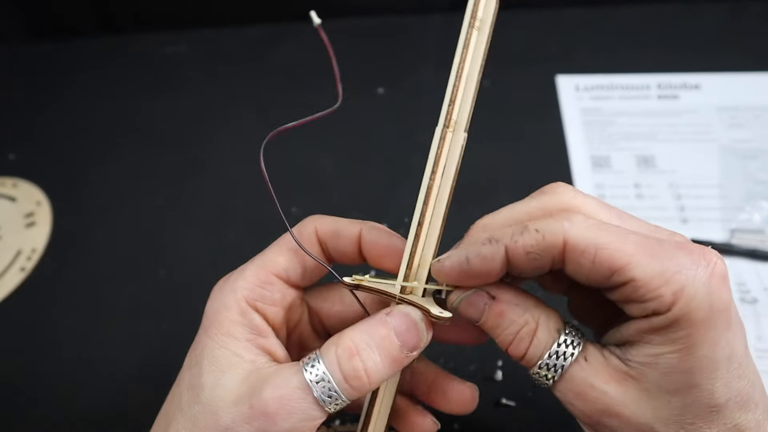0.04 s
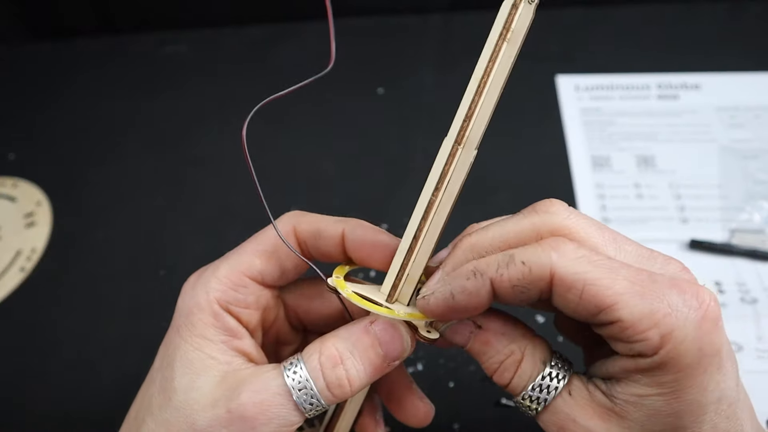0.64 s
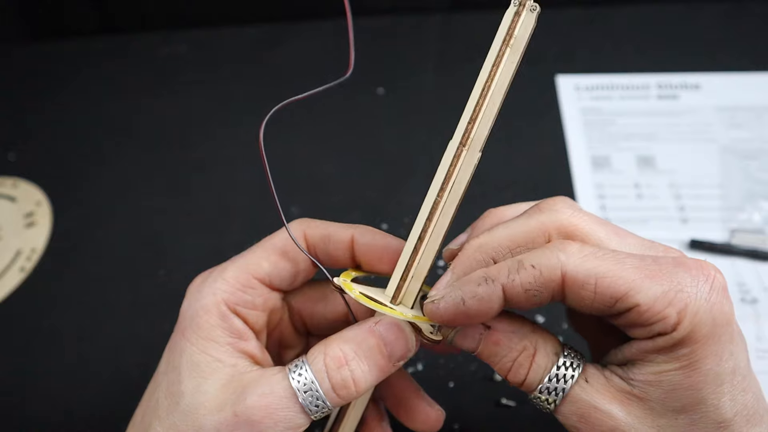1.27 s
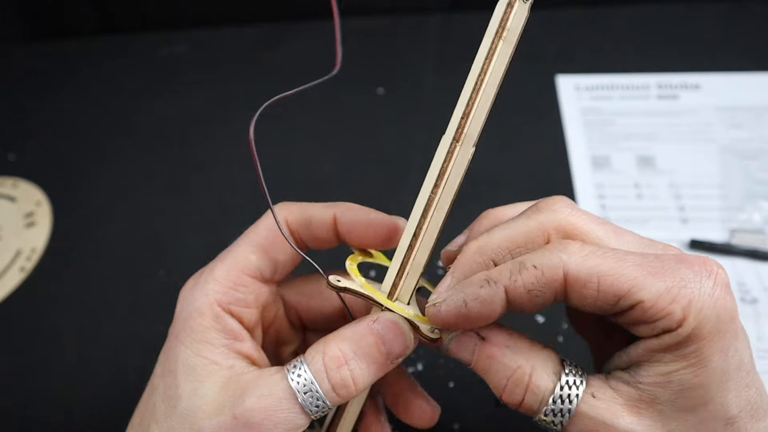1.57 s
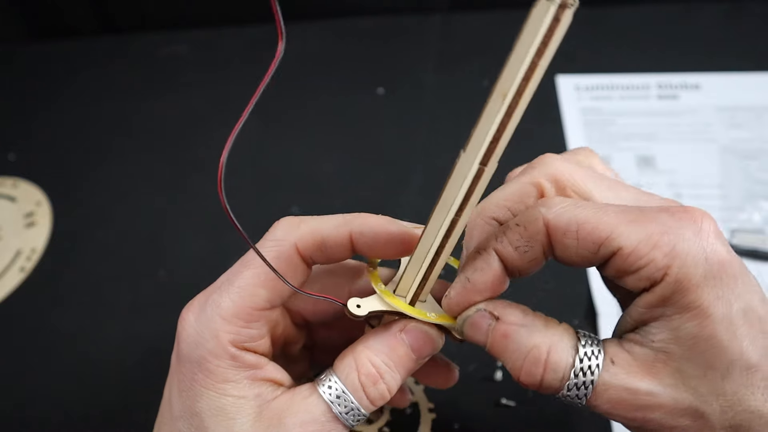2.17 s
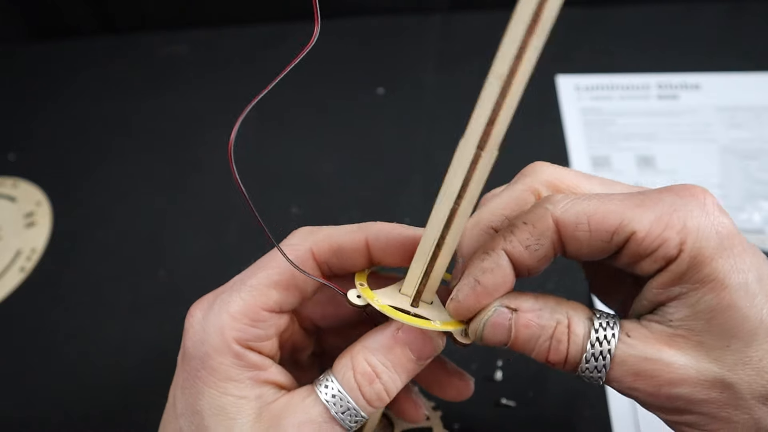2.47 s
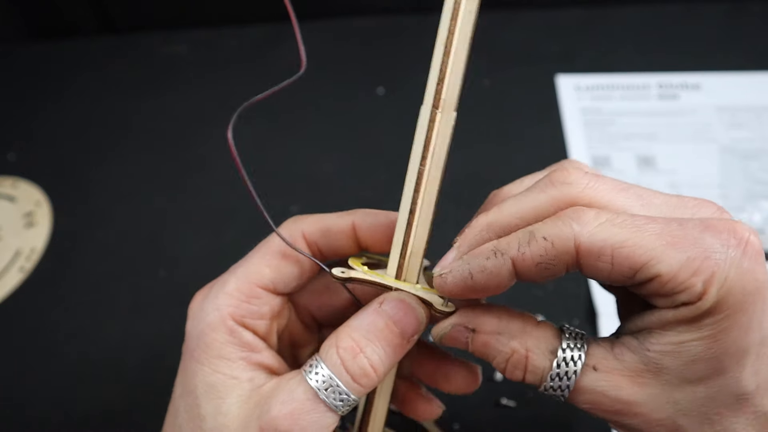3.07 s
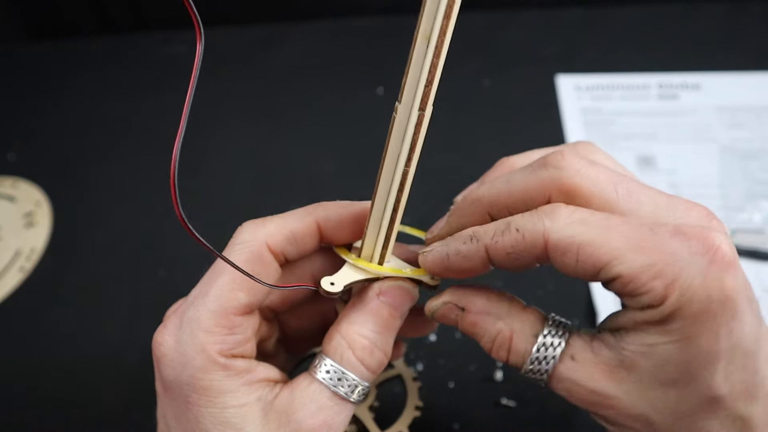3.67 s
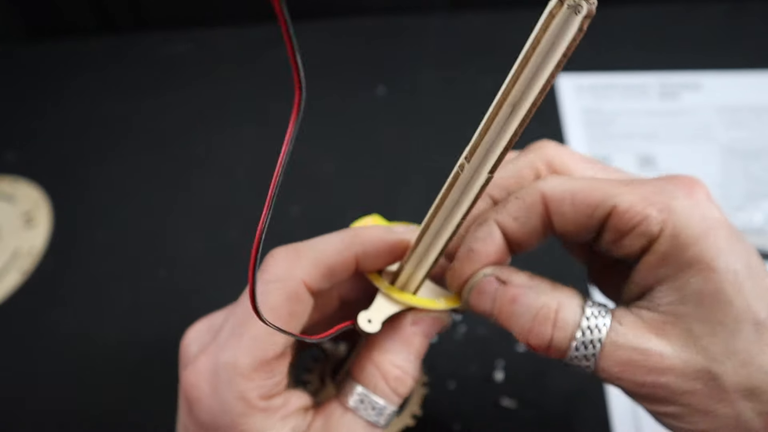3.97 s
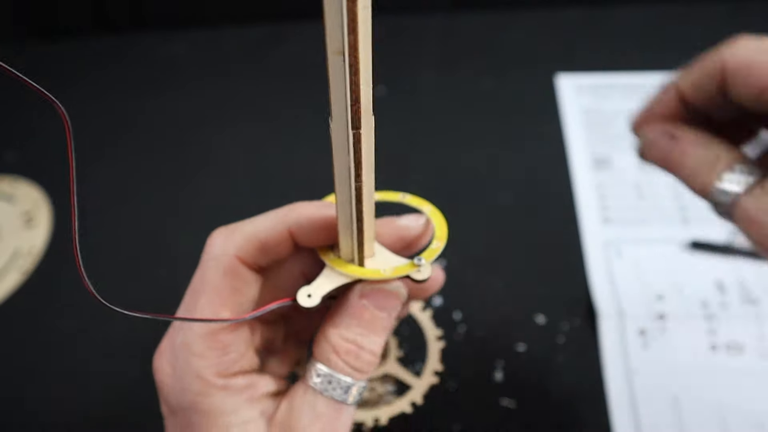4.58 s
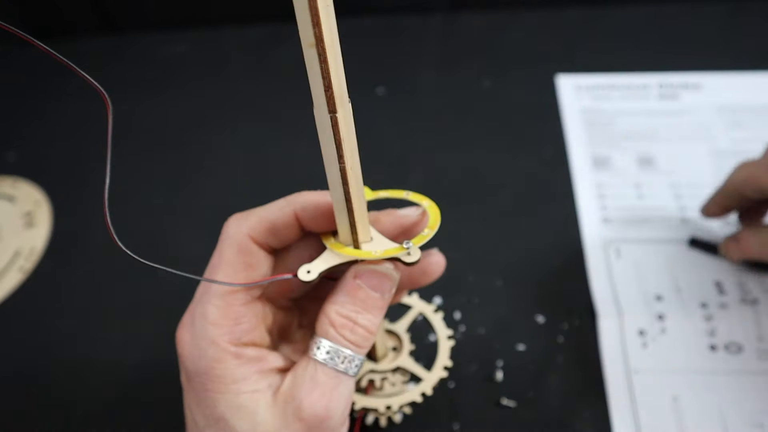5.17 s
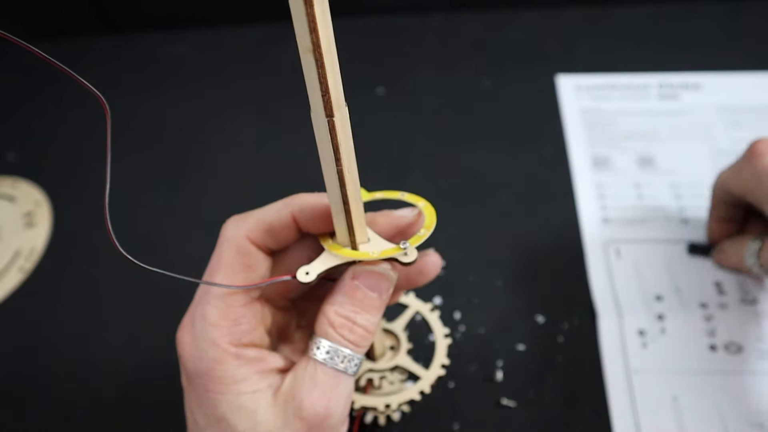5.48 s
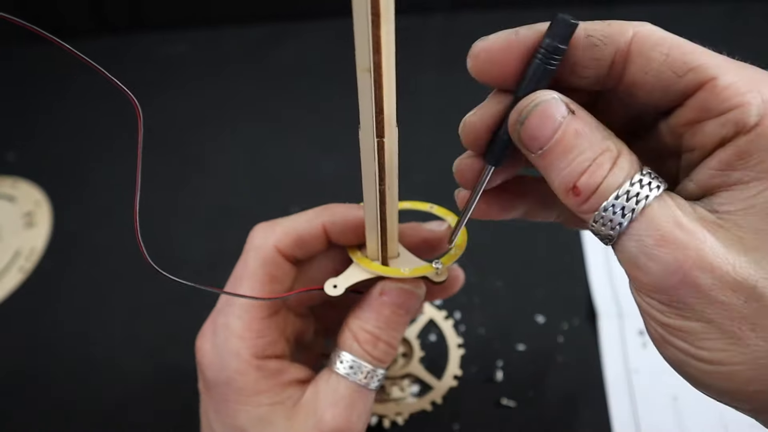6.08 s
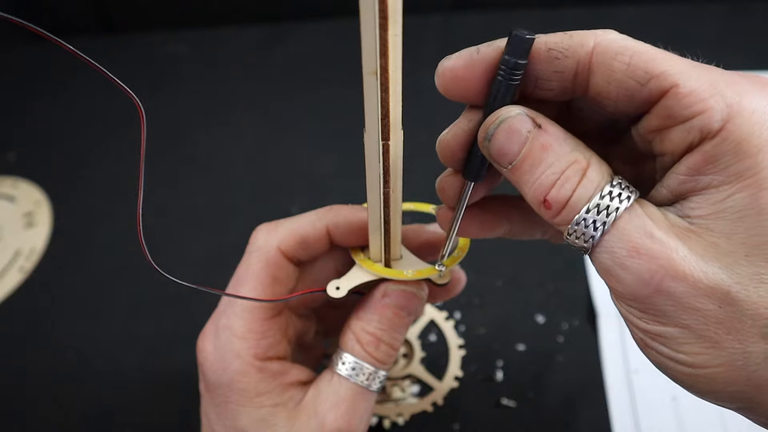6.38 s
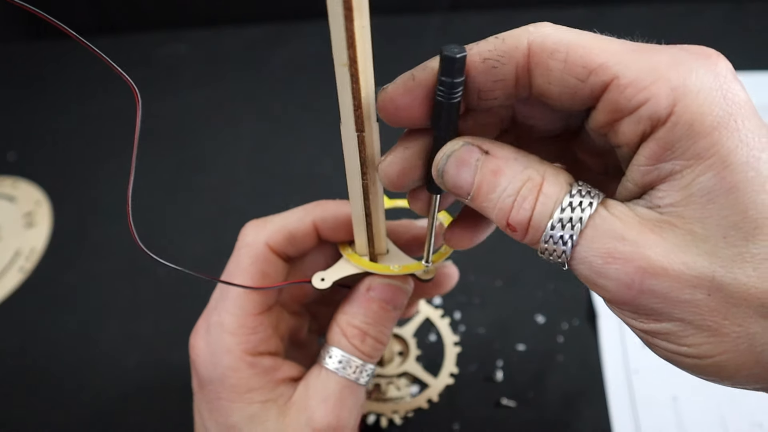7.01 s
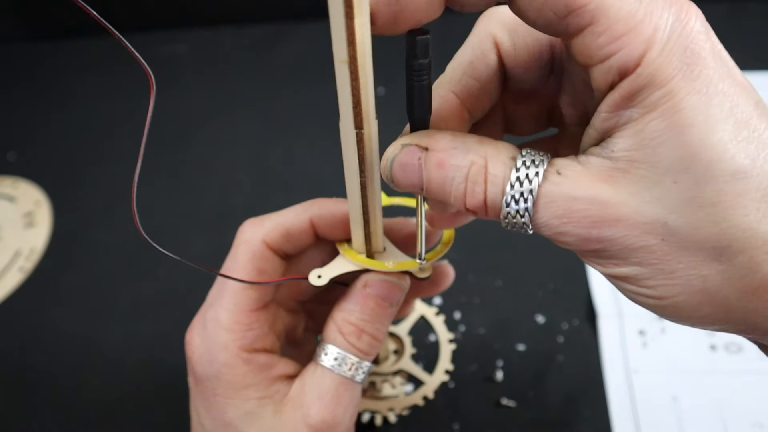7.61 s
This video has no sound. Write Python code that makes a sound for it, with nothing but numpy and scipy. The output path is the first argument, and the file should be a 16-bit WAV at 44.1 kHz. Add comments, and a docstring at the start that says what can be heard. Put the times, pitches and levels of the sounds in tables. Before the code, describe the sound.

Small plywood parts are handled close by in a quiet, dry room, with a soft steady hiss and low rumble underneath. A light, crisp click comes right at the start, followed by faint rubs and another click with a tiny squeak near 0.4 seconds. Sparse clicks continue, with a double click at 2.3 seconds and another at 2.6. At about 3.3 seconds the parts snap home with one sharp, bright click, the loudest sound. From 4.7 to 5.5 seconds a screwdriver is picked off the table: a few clattering knocks with a brief steel ring, faint scrapes and squeaks, and low booms as the hand bumps the tabletop. Light ticks of the tool and a small screw come near 5.9, 6.6 and 7.5 seconds, along with soft, dull table bumps. A last low thump and a faint wooden rub come around 7.7 seconds.

```python
"""First come the clicks and rubs of small plywood parts being fitted by hand; once they snap home loudly.
Then a screwdriver is picked off the work table with a few knocks that make the top boom, and its tip
ticks on a small screw. Each hit or slip shakes the wood or steel, which rings at its own pitches.
A soft hiss and rumble from the quiet, dry room lie under it all."""
import sys
import numpy as np
from scipy import signal
from scipy.fft import rfft, irfft
from scipy.io import wavfile
from scipy.ndimage import uniform_filter1d

SR = 44100
rng = np.random.default_rng(int(sys.argv[2]) if len(sys.argv) > 2 else 0)


def waveform_to_disk(signal):
    """Save audio, clipped to [-1, 1], as 16-bit WAV at the path in sys.argv[1]."""
    frames = np.transpose(np.atleast_2d(signal))
    scaled = np.clip(frames, -1, 1) * 32767
    samples = np.round(scaled).astype(np.int16)
    wavfile.write(sys.argv[1], SR, samples)


N = 346185
TOP_HZ = 15850
SNAP_DB = -13  # a click this strong counts as a full snap
SIDES = np.array([[1], [-1]])  # plus on the left, minus on the right


# Clicks of the parts (in every table, levels are relative): start_s, level_db
CLICK_TIMES = [(.0035, -23), (.037, -33), (0.4389, -29), (1.3821, -32), (1.723, -36), (2.312, -28.5),
               (2.3253, -25), (2.6333, -30.5), (3.2709, -10)]
# Pitches that plywood rings at; wider ones die sooner: pitch_hz, width_hz, level_db
WOOD_RINGS = [(1100, 700, -9), (2080, 300, -10), (2700, 500, -15), (3320, 300, -7), (4310, 440, 4),
              (5050, 400, 0), (5500, 300, -2), (6370, 380, -5), (6900, 320, -5), (7560, 340, -2),
              (8150, 320, -3), (8680, 320, -5), (9300, 450, -8), (10300, 350, -11), (11000, 300, -15),
              (13500, 2500, -24)]

def wood_clicks(slip_db=-22, slip_fade_s=0.027, crack_db=-11.5):
    """An edge slips and stops hard, ringing the wood. Returns the clicks and cracks for the room to echo."""
    out, to_room, t = np.zeros(N), np.zeros(N), clock(.04)
    room_crack = sized(signal.sosfilt(butter(2, [4000, 9500], "band"), 1. * (t == 0)), 0.00095)
    crack_band = np.vstack([butter(2, 1700, "high"), butter(6, 10500)])
    for start_s, db in CLICK_TIMES + faint_clicks():
        lighter_db = SNAP_DB - db  # lighter clicks have more tiny slips and more dry crack
        slips = grains(t, per_s=3500, spread_db=8) * fade(t, slip_fade_s)
        force = from_db(slip_db + 0.37 * lighter_db) * slips
        force[0] = 1  # the hard stop
        force = evened(force, 710)
        crack = from_db(crack_db + 1.14 * lighter_db) * rms_one(signal.sosfilt(crack_band, force))
        ring = rms_one(brighten(resonate(force, WOOD_RINGS), tilt_db=1))
        add(out, start_s, from_db(db - 6) * sized(ring + crack, 0.0011))
        add(to_room, start_s, from_db(db - 19) * room_crack)
    return out, to_room


def faint_clicks(count=4, from_s=.5, to_s=3.2):
    """Working the parts into place makes faint clicks by chance. Returns rows of start_s, level_db."""
    return [(rng.uniform(from_s, to_s), rng.uniform(-47, -43)) for _ in range(count)]


# Wood sliding on wood: start_s, length_s, level_db
WOOD_SLIDES = [(.055, .043, -59.5), (.252, .045, -54), (.392, 0.03, -60), (.79, .07, -64),
               (1.66, 0.073, -59.5), (7.7, .13, -67.5)]
# High ringing of the sliding edges: pitch_hz, width_hz, level_db
EDGE_RINGS = [(2880, 1600, 2), (8900, 720, 7)]

def wood_rubs():
    """The parts slide over each other, so their ring is dulled and their edges sing."""
    rings = damped(WOOD_RINGS, least_width_hz=500) + EDGE_RINGS
    return rubs(WOOD_SLIDES, rings, per_s=2000, spread_db=7)


# Squeaks and rasps: start_s, length_s, level_db, pitch_hz, width_hz
SQUEAK_TIMES = [(0.441, 0.0097, -48.5, 4720, 400), (4.993, 0.016, -56, 1110, 160),
                (5.06, 0.025, -52, 560, 300), (5.484, 0.05, -54, 1130, 200),
                (7.679, 0.044, -64.5, 4930, 160)]

def squeaks():
    """An edge sticks and slips very quickly, ringing at one pitch."""
    out, t = np.zeros(N), clock(.1)
    for start_s, length_s, db, hz, width_hz in SQUEAK_TIMES:
        slips = grains(t, per_s=3000, spread_db=3) * np.sin(np.pi * np.minimum(t / length_s, 1))
        ring = resonate(slips, [(hz, width_hz, 0)])
        ring = resonate(ring, [(hz, hz, 0)])  # trims sound far from the pitch
        add(out, start_s, from_db(db) * sized(ring, length_s))
    return out


# The screwdriver hitting the table: start_s, level_db, shaft_ring_db
KNOCK_TIMES = [(4.805, -49.5, -22), (4.824, -34.5, 11), (4.879, -45.5, -20), (4.918, -51, 17),
               (5.0595, -37, 7), (5.081, -43, -13), (5.256, -50.5, 26), (5.442, -50.5, -18)]
# Ringing of the whole screwdriver: pitch_hz, width_hz, level_db
TOOL_RINGS = [(755, 760, 5), (1130, 41, 9.5), (1350, 120, -6), (1820, 560, -12), (2440, 410, -10),
              (3140, 180, 6.5), (3750, 320, 6), (4620, 190, 6), (5060, 410, 0), (5420, 250, 5.5),
              (6100, 400, 3.5), (6970, 400, 4), (8060, 1300, -1), (10160, 620, -2), (11400, 760, -5.5),
              (14600, 1300, -6)]
# Thin, high ringing of its steel shaft: pitch_hz, width_hz, level_db
SHAFT_RINGS = [(14500, 38, 0), (14870, 70, -10), (15700, 80, -10)]

def screwdriver_knocks(hard_db=-32.5, light_clatter_s=.003, hard_clatter_s=0.026):
    """The handle lands in a clatter. Harder knocks last longer; more shaft ring makes them brighter."""
    out, t = np.zeros(N), clock(.15)
    for start_s, db, shaft_db in KNOCK_TIMES:
        clatter_s = light_clatter_s + (hard_clatter_s - light_clatter_s) * from_db(db - hard_db) ** 2
        force = grains(t, per_s=2200, spread_db=4) * np.exp(-(t / clatter_s) ** 2)
        force[0] = 1  # the first hit
        build_up = 1 - 0.29 * np.exp(-t / (0.43 * clatter_s))
        force = evened(force, 250) * build_up
        ring = resonate(force, TOOL_RINGS) + from_db(shaft_db) * resonate(force, SHAFT_RINGS)
        ring = brighten(ring, tilt_db=0.12 * shaft_db)
        add(out, start_s, from_db(db - 1) * sized(ring, 0.011))
    return out


# Light ticks of small parts and the screw, plus the screwdriver ringing out at one pitch
# in its two hardest knocks: start_s, level_db, pitch_hz, width_hz
TICK_AND_RING_TIMES = [(4.697, -41, 1645, 150), (4.828, -39, 1130, 70), (5.059, -33.5, 3140, 70),
                       (5.1511, -40.5, 2830, 900), (5.8608, -46.5, 6300, 700), (5.87, -48, 6200, 700),
                       (6.54, -51.5, 4870, 2200), (6.605, -46, 6040, 3200), (7.528, -49, 5700, 300),
                       (7.532, -56, 3970, 300)]

def ticks_and_rings(chatter_db=-13, chatter_fade_s=0.021):
    """A hit with a brief chatter rings a part, the screw or the screwdriver at one pitch."""
    out, t = np.zeros(N), clock(.04)
    for start_s, db, hz, width_hz in TICK_AND_RING_TIMES:
        chatter = from_db(chatter_db) * grains(t, per_s=2800, spread_db=3) * fade(t, chatter_fade_s)
        force = evened((t == 0) + chatter, 330)
        ring = resonate(force, [(hz, width_hz, 0)])
        ring = resonate(ring, [(hz, min(5 * width_hz, hz), 0)])  # trims sound far from the pitch
        add(out, start_s, from_db(db) * sized(ring, .003))
    return out


# The screwdriver sliding on the table: start_s, length_s, level_db
TOOL_SLIDES = [(4.84, 0.21, -59.5), (5.06, .17, -59), (5.412, 0.11, -58)]

def screwdriver_drags():
    """The tool scrapes along the table, which dulls its ring."""
    scrape = rubs(TOOL_SLIDES, damped(TOOL_RINGS, least_width_hz=805), per_s=500, spread_db=3)
    return brighten(scrape, tilt_db=-2)


# Hands bumping the table: start_s, level_db, hold_s, knock_db
HAND_BUMPS = [(.285, -48, 0.0054, 0), (4.827, -26.5, .055, 1), (5.063, -40.5, 0.081, 5.5),
              (5.416, -31.5, 0.082, -0.5), (5.844, -37, 0.022, -12), (6.542, -42.5, 0.013, 0),
              (6.608, -41, 0.027, 5.5), (6.838, -48, 0.024, 0.5), (6.938, -42.5, 0.055, -1),
              (7.524, -48, .035, 6), (7.662, -41.5, 0.036, -2.5), (7.724, -36, 0.078, -3)]
# Ringing of the table top besides its main boom: pitch_hz, width_hz, level_db
TABLE_RINGS = [(77, 14, 6.5), (150.6, 34, 9), (242, 38, -3.5), (275, 29, 0), (333.8, 12, 3.5), (423, 15, 0),
               (532, 42, -1.5), (540, 100, -12), (772, 15, -15)]

def table_booms(boom_hz=119.7, boom_width_hz=22.5, attack_s=0.0037, release_s=0.011):
    """A soft push makes the top boom; the roughness of the touch adds a knock from its other pitches."""
    out, t = np.zeros((2, N)), clock(.4)
    # The hand settles softly after each bump, and each listed click thumps through the hands.
    settles = [(s + .108, db - 12, .012, -3) for s, db, _, _ in HAND_BUMPS]
    thumps = [(s + .0011, -40 + 0.57 * (db - SNAP_DB), .0048, -4) for s, db in CLICK_TIMES]
    sway_hz = boom_hz + 11 - 300 * t  # starts high and sags as the hand loads the top
    sway = np.sin(2 * np.pi * np.cumsum(sway_hz) / SR)
    for start_s, db, hold_s, knock_db in HAND_BUMPS + settles + thumps:
        pressure = np.minimum(t / attack_s, 1) * np.exp(-np.maximum(t - hold_s, 0) / release_s)
        boom = sized(resonate(pressure * sway, [(boom_hz, boom_width_hz, 0)]), 0.016)
        roughness = rng.standard_normal((2, len(t))) * pressure * np.exp(-t / 0.042)
        mid, side = (sized(resonate(evened(force, 50), TABLE_RINGS), .025) for force in roughness)
        side = signal.sosfilt(butter(2, 200, "high"), side)  # deep sound reaches both sides alike
        knock = mid + from_db(-5) * side * SIDES
        add(out, start_s, from_db(db) * (boom + from_db(knock_db - 5) * knock))
    return out


def near_echoes(x, bounce_s, bounce_db, scatter_db, scatter_fade_s):
    """Sound arrives directly, bounces off the table and scatters left and right off hands and things."""
    t = clock(.04)
    scatter = rng.standard_normal((2, len(t))) * fade(t, scatter_fade_s) * (t > .0003)
    mid, side = from_db(scatter_db) * scatter / np.linalg.norm(scatter, axis=1, keepdims=True)
    mid[0] += 1  # the direct sound
    mid[int(bounce_s * SR)] += from_db(bounce_db)
    echoes = evened(mid, 200) + from_db(-5) * evened(side, 200) * SIDES
    return signal.fftconvolve(x[None], echoes)[:, :N]


def room_echo(x, build_s=0.017, fade_s=0.23, dull_above_hz=10000):
    """Echoes from the walls build up into a short, smooth tail."""
    t = clock(.4)
    tail = rng.standard_normal((2, len(t))) * fade(t, fade_s) * np.clip(t / build_s, 0, 1) ** 2
    tail = signal.sosfilt(butter(4, dull_above_hz), tail / np.linalg.norm(tail[0]))
    return signal.fftconvolve(x[None], tail)[:, :N]


# Strength of the room's noise from low to high: pitch_hz, level_db
NOISE_SHAPE = [(12, -36), (20, -11), (22, -13.5), (59, -0.5), (92, -4), (119, 0.5), (148, -5), (324, -8.5),
               (372, -9), (614, -13.5), (705, -14), (1010, -16), (2270, -21), (7520, -25), (15500, -27.5)]
# How alike that noise is left and right: pitch_hz, likeness (1 means the same)
NOISE_LIKENESS = [(60, 1), (130, 0.79), (290, 0.4), (640, 0.18), (1410, 0.26), (3100, 0.32), (6820, 0.39),
                  (15000, 0.54)]

def room_noise(level_db=-54):
    """A steady rumble sits in the middle, with a hiss spread wider around it."""
    hz = np.arange(N // 2 + 1) * SR / N
    shape = from_db(at_hz(NOISE_SHAPE, hz)) * (hz > 15) * (hz < TOP_HZ)
    mid, side = rfft(rng.standard_normal((2, N))) * shape
    alike = np.clip(at_hz(NOISE_LIKENESS, hz), 0, .995)
    mid = irfft(mid, N)
    side = irfft(side * np.sqrt((1 - alike) / (1 + alike)), N)
    return from_db(level_db) * (mid + side * SIDES) / np.std(mid)


def rubs(slides, rings, per_s, spread_db):
    """Sliding surfaces catch and let go many times, and each catch rings the part."""
    out, t = np.zeros(N), clock(.25)
    for start_s, length_s, db in slides:
        pressure = np.sqrt(np.clip(np.sin(np.pi * np.minimum(t / length_s, 1)), 0, 1))
        force = grains(t, per_s, spread_db) * pressure
        add(out, start_s, from_db(db) * sized(resonate(force, rings), length_s))
    return out


def grains(t, per_s, spread_db):
    """Tiny random pushes and pulls of uneven size."""
    direction, size = rng.standard_normal((2, len(t)))
    happens = rng.random(len(t)) < per_s / SR
    return happens * np.sign(direction) * from_db(spread_db * np.clip(size, -2, 2))


def resonate(force, rings):
    """A force rings an object at all its pitches at once; every second ring is flipped in sign."""
    out = 0
    for k, (hz, width_hz, db) in enumerate(rings):
        r = np.exp(-np.pi * width_hz / SR)
        poles = [1, -2 * r * np.cos(2 * np.pi * hz / SR), r * r]
        gain = (-1) ** k * from_db(db) * (1 - r * r) / 2
        out = out + gain * signal.lfilter([1, 0, -1], poles, force + 1e-18)
    return out


def damped(rings, least_width_hz):
    """Pressed against something, an object stops ringing sooner."""
    return [(hz, max(width_hz, least_width_hz), db) for hz, width_hz, db in rings]


def evened(x, smooth_hz, size=32768):
    """Keep a burst's ragged timing but make it about equally strong from low to high."""
    spectrum = rfft(x, size)
    power = uniform_filter1d(np.abs(spectrum) ** 2, max(int(smooth_hz * size / SR), 1))
    cepstrum = irfft(-np.log(np.abs(power) + 1e-12))
    cepstrum[size // 2:] = 0  # so nothing sounds before the burst starts
    flat = irfft(spectrum * np.exp(rfft(cepstrum)))[:len(x)]
    return flat / np.linalg.norm(flat)


def brighten(x, tilt_db, split_hz=5000):
    """Raise the highs and lower the lows, as a harder hit does; a negative tilt dulls."""
    low = signal.sosfilt(butter(1, split_hz), x)
    return low * from_db(-tilt_db) + (x - low) * from_db(tilt_db)


def butter(order, hz, keep="low"):
    """A filter that keeps the lows, the highs or a band."""
    return signal.butter(order, hz, keep, fs=SR, output="sos")


def fade(t, seconds):
    """Die away by 60 dB in that time."""
    return from_db(-60 * t / seconds)


def from_db(db):
    """Decibels to gain."""
    return 10 ** (np.asarray(db) / 20)


def rms_one(x):
    """Scale to an average strength (rms) of 1."""
    return x / np.sqrt(np.mean(x ** 2) + 1e-20)


def sized(x, seconds):
    """Give a short sound the energy of an rms-1 sound of that length."""
    return x * np.sqrt(seconds * SR / (np.sum(x ** 2) + 1e-20))


def clock(seconds):
    """The time of each sample in a short sound."""
    return np.arange(int(seconds * SR)) / SR


def add(track, start_s, sound):
    """Mix a sound into the track."""
    start = int(start_s * SR)
    part = sound[..., :N - start]
    track[..., start:start + part.shape[-1]] += part


def at_hz(points, hz):
    """Read between the rows of a table of pitches."""
    pitches, values = np.array(points).T
    return np.interp(np.log(hz + 1), np.log(pitches), values)


def scene():
    """Wood and tool sound close by, over the table's boom and the room's noise."""
    clicks, cracks = wood_clicks()
    sliding = wood_rubs() + squeaks()
    tool = screwdriver_drags() + screwdriver_knocks() + ticks_and_rings()
    near_wood = near_echoes(clicks + sliding, bounce_s=.0016, bounce_db=-1,
                            scatter_db=0, scatter_fade_s=.021)
    near_wood *= from_db(-0.9 * SIDES)  # a little to the right
    near_tool = near_echoes(tool, bounce_s=.000773, bounce_db=-15.5, scatter_db=1, scatter_fade_s=.02)
    walls = room_echo(cracks + from_db(-15) * (tool + sliding))
    return near_wood + near_tool + walls + table_booms() + room_noise()


def record(dry):
    """The very highest treble is cut off steeply."""
    return signal.sosfilt(signal.ellip(12, .1, 80, TOP_HZ, fs=SR, output="sos"), dry)


dry = scene()
out = record(dry)
waveform_to_disk(out)
```